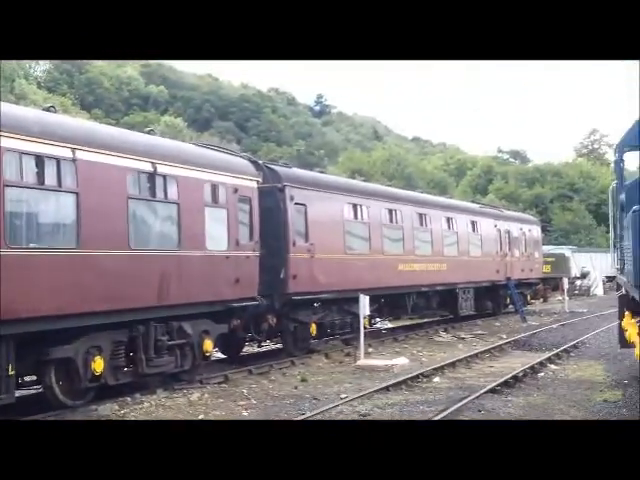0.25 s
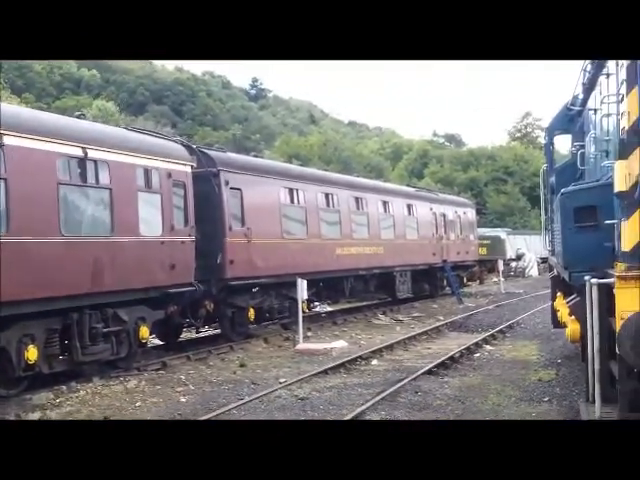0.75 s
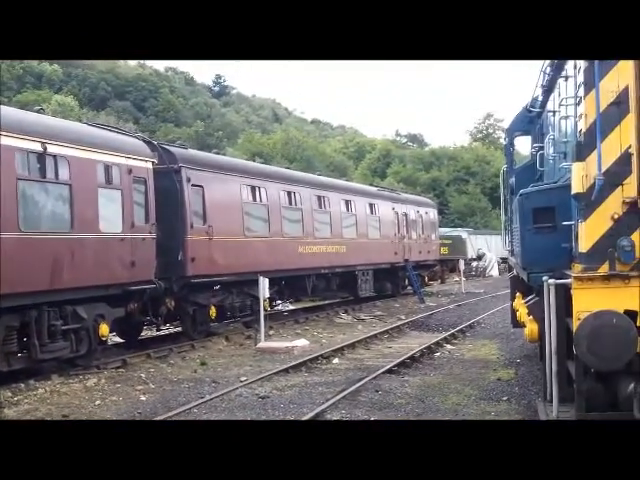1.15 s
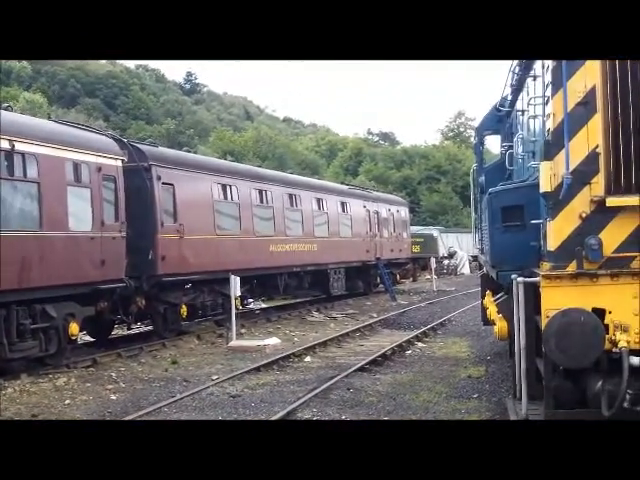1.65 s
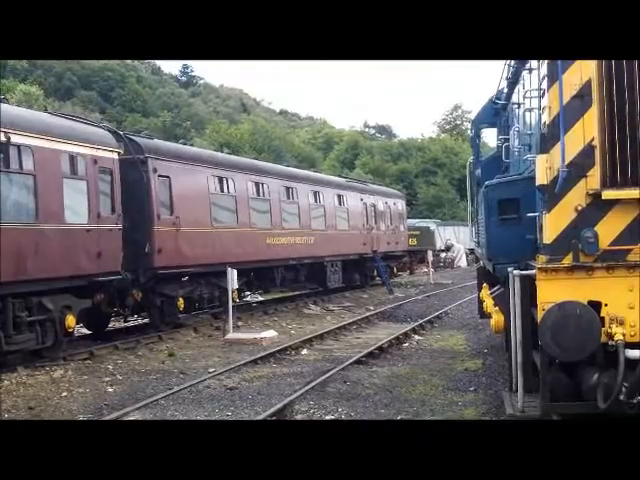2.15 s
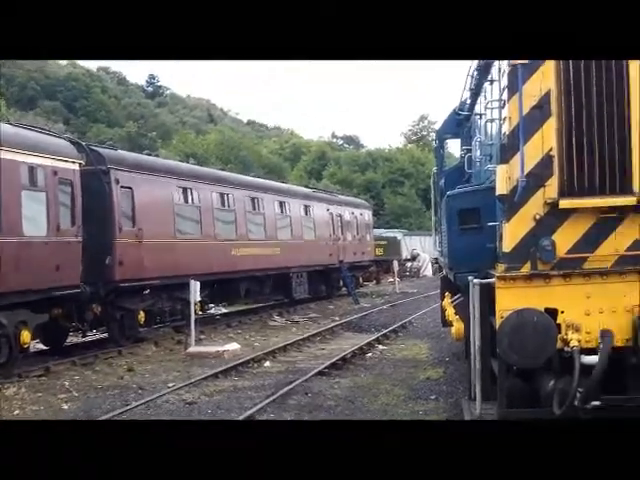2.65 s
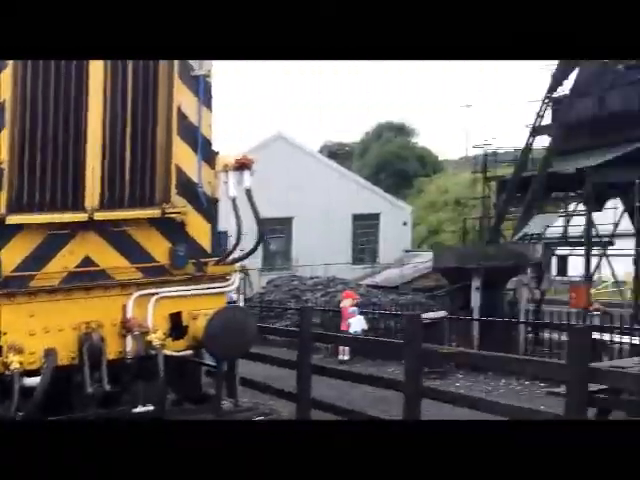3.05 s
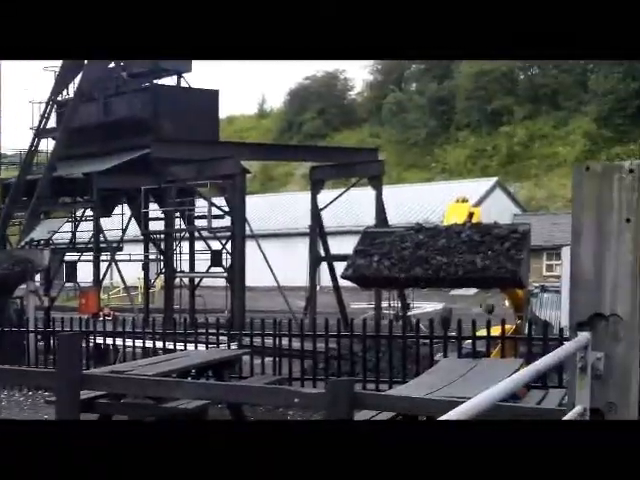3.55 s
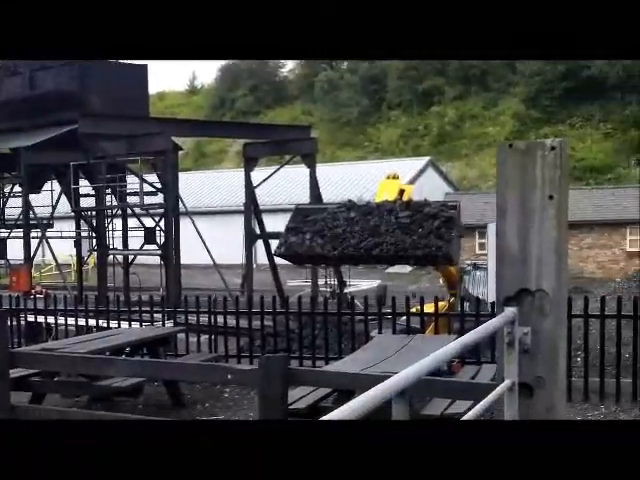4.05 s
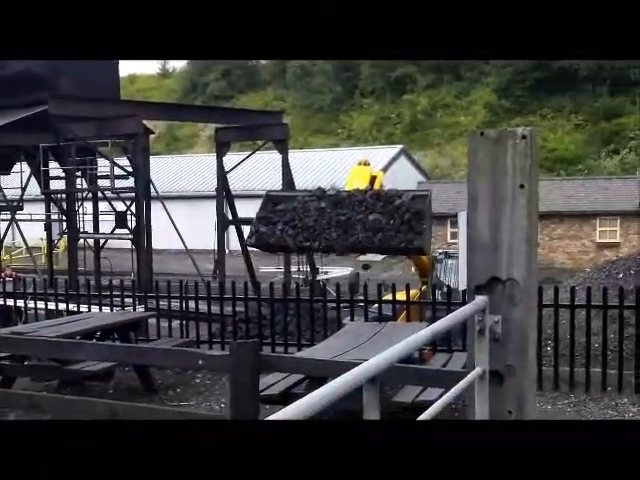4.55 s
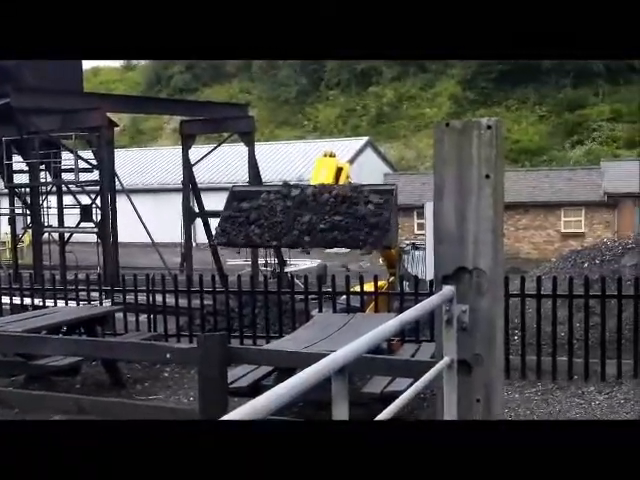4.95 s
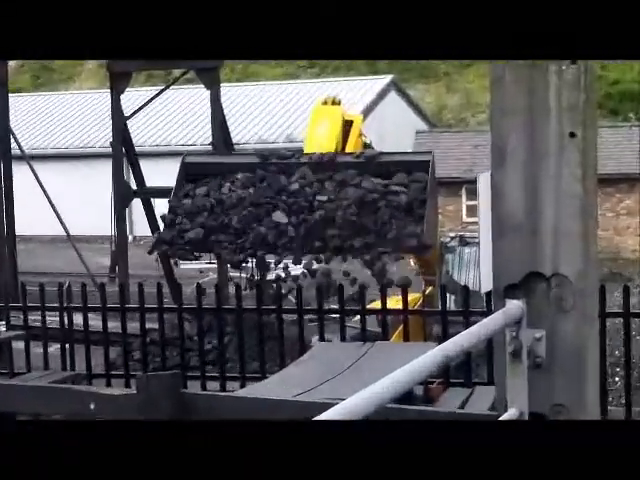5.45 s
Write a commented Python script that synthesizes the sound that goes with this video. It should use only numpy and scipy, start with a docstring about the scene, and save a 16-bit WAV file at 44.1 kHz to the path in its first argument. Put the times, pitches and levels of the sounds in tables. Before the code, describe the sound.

In an open railway yard a loader's diesel drones low, with airy noise and wind buffeting the microphone. Within a second, small coal builds into a dense dry clatter full of sharp cracks and hollow knocks. It thins into uneven bursts, then big lumps slump and thud with low booms before the pour swells again. Small, slightly dull microphone, short echo from sheds.

```python
"""Coal pours from a wheel loader's bucket across an open railway yard.
A rush of small coal is a hail of short ringing contacts, with snapping cracks and hollow knocks of single pieces.
Then heavy lumps come down: damped low thuds, and slumps that boom through gliding resonances over a rumble.
The loader's diesel, a stack of wavering sines, drones under it with filtered-noise air and light wind on the
microphone; nearby sheds answer the coal with a decaying diffuse tail."""
import sys
import numpy as np
from scipy import signal
from scipy.fft import rfft, irfft, next_fast_len
from scipy.io import wavfile
from scipy.ndimage import map_coordinates

SR = 44100
rng = np.random.default_rng(int(sys.argv[2]) if len(sys.argv) > 2 else 0)


def int16_out(signal):
    """Quantize to a 16-bit WAV file."""
    q = np.round(np.clip(np.atleast_2d(signal).T, -1, 1) * 32767)
    wavfile.write(sys.argv[1], SR, q.astype(np.int16))


N = 251370  # length [samples]

# orders of the loader's diesel: (frequency [Hz], level [dB])
DIESEL_ORDERS = [(33.3, -41.5), (66.6, -44.5), (133.2, -62), (166.5, -53.5), (211, -50)]
# tone of the yard's steady air: (frequency [Hz], relative level [dB])
YARD_TONE = [(20, 4.5), (70, -5), (200, -2), (300, -10), (800, -13.5), (2000, -16), (4500, -32.5),
             (7000, -40), (10000, -36), (15000, -40.5)]
# tone of the wind on the microphone: (frequency [Hz], relative level [dB])
WIND_TONE = [(8, -16.5), (20, -2.5), (35, -8.5), (60, -8.5), (120, -19), (400, -81), (1000, -100)]
# strength of the wind: (time [s], level [dB])
WIND_LEVEL = [(0, -56), (.2, -34), (1.4, -40), (1.7, -35.5), (2.35, -33), (2.7, -41), (4.5, -40),
              (5.1, -36), (5.7, -43)]

# the steady stream of small coal over the bucket's lip: (time [s], level [dB])
STREAM_LEVEL = [(0, -61), (.25, -47), (.42, -39.5), (.63, -35), (.9, -30.5), (1.12, -24), (1.5, -22),
                (1.84, -23.5), (1.88, -22.5), (2.24, -25), (2.38, -24.5), (2.46, -26.5), (2.56, -26),
                (3.05, -27), (3.3, -26.5), (3.4, -32), (3.8, -31), (4.0, -34), (4.15, -31.5), (4.3, -35.5),
                (4.68, -35), (4.85, -28.5), (5.04, -34.5), (5.14, -34), (5.42, -25.5), (5.7, -23.5)]
# batches of small coal sliding off on top of the stream: (time [s], length [s], level [dB])
SPILL_BATCHES = [(0.481, 0.042, -35.5), (0.591, 0.062, -32.5), (0.74, 0.036, -37), (2.489, 0.091, -25.5),
                 (2.657, 0.1, -28.5), (2.87, 0.057, -28), (2.981, .045, -25), (3.18, 0.028, -30.5),
                 (3.432, 0.011, -25.5), (3.59, 0.0099, -25), (3.63, 0.074, -30), (3.761, 0.085, -27),
                 (3.907, 0.012, -25), (4.128, 0.027, -26.5), (4.174, 0.044, -33.5), (4.392, 0.016, -27),
                 (4.548, 0.039, -30), (4.614, 0.032, -24.5), (4.74, 0.037, -28.5), (4.854, 0.02, -26),
                 (4.9, 0.021, -23.5), (4.978, 0.027, -27), (5.161, 0.076, -28), (5.252, 0.044, -28),
                 (5.463, 0.099, -23.5)]
SPILL_ATTACK_S, SPILL_RELEASE_S = 0.0064, 0.015
# tone of the clatter: (frequency [Hz], relative level [dB])
CLATTER_TONE = [(350, -26), (650, -11), (1100, -3), (1500, -1), (2500, 1.5), (3300, -2.5), (4000, -6.5),
                (4700, -14), (6200, -19.5), (7000, -24.5), (9000, -32.5), (15000, -110)]
# a bed of coal builds up between these times and softens the landing
BED_STARTS_S, BED_DEEP_S = 1, 4.4
# coarse clatter and fine crackle relative to the middle band, on bare ground and on the bed
COARSE_BARE_DB, COARSE_BEDDED_DB = -3, -6
FINE_BARE_DB, FINE_BEDDED_DB = -11, -13
# bigger pieces that clack singly, relative to the slack; they fade as the flow thins below FULL_FLOW_DB
COBBLES_DB, FULL_FLOW_DB = -7, -22
# highest hiss, relative to the flow of small coal
FIZZ_BARE_DB, FIZZ_BEDDED_DB = -34.5, -36.5

# single lumps cracking on each other: (time [s], level [dB], pitch [Hz], t60 of the chip spray [s])
LUMP_CRACKS = [(.188, -29, 1700, .07), (.214, -29, 1900, .07), (.308, -22.5, 1700, .04),
               (.3398, -16.5, 1650, .06), (.4, -26, 2800, .08), (.445, -22.5, 1800, .04),
               (.485, -17.5, 2200, .07), (.6, -20, 2000, .06), (.636, -16, 2400, .05),
               (.739, -18, 2400, .04), (.824, -16.5, 2300, .05), (.856, -16.5, 2100, .04),
               (.895, -17, 2000, .05), (.944, -13, 1300, .03), (.947, -14, 2200, .04),
               (.987, -12.5, 2000, .08), (1.013, -10, 1500, .05), (1.049, -12, 2000, .025),
               (1.084, -10, 2000, .04), (1.102, -9, 1900, .06), (1.154, -10, 1800, .07),
               (1.184, -11.5, 1300, .04), (1.209, -10.5, 1700, .05), (1.367, -8.5, 2400, .08),
               (1.417, -10.5, 2300, .07), (1.502, -11, 2400, .05), (1.668, -10, 1800, .05),
               (1.71, -9.5, 2300, .06), (1.792, -11, 1600, .03), (1.83, -10, 2100, .05),
               (1.926, -9.5, 2300, .06), (2.066, -10, 2200, .05), (2.107, -11.5, 2000, .04),
               (2.332, -12, 2000, .06), (2.506, -12, 2300, .04), (2.54, -10, 1700, .08),
               (2.666, -13, 2100, .07), (2.722, -12.5, 2100, .04), (2.741, -12.5, 2100, .05),
               (2.845, -11.5, 2500, .04), (2.915, -13.5, 2400, .06), (2.983, -11, 2100, .07),
               (3.069, -11, 1400, .05), (3.101, -9, 2700, .055), (3.155, -11, 2000, .05),
               (3.202, -15.5, 2600, .05), (3.261, -15, 6400, .035), (3.287, -10, 2400, .08),
               (3.334, -14.5, 2400, .06), (3.419, -16, 1600, .04), (3.44, -17.5, 2400, .05),
               (3.489, -15, 3200, .06), (3.508, -16, 2200, .03), (3.524, -17.5, 2300, .04),
               (3.545, -18.5, 2200, .06), (3.586, -12, 2100, .08), (3.633, -13.5, 2200, .07),
               (3.642, -16, 4500, .11), (3.673, -15.5, 2500, .05), (3.72, -11, 2200, .06),
               (3.735, -10, 2400, .04), (3.801, -7.5, 2700, .025), (3.915, -16.5, 2300, .06),
               (3.947, -17.5, 2500, .07), (4.025, -14.5, 3000, .08), (4.071, -16.5, 1900, .06),
               (4.105, -17, 2500, .06), (4.157, -16, 2450, .05), (4.211, -15, 2100, .05),
               (4.233, -19, 2400, .05), (4.305, -19.5, 2200, .06), (4.356, -21.5, 1800, .06),
               (4.4, -17.5, 2200, .06), (4.494, -23, 2200, .05), (4.535, -13.5, 1900, .05),
               (4.552, -16, 1700, .05), (4.602, -12.5, 2100, .05), (4.646, -11, 2100, .04),
               (4.698, -16, 2500, .08), (4.736, -11.5, 2900, .05), (4.75, -8, 2200, .045),
               (4.828, -9, 2500, .045), (4.86, -13, 2900, .05), (4.918, -11.5, 2200, .045),
               (4.95, -10.5, 2650, .07), (4.982, -13, 2700, .05), (5.013, -16.5, 2500, .05),
               (5.057, -15, 2350, .06), (5.095, -16, 2900, .08), (5.196, -13, 2500, .05),
               (5.277, -10.5, 1900, .045), (5.3115, -12, 1600, .035), (5.361, -11, 2600, .055),
               (5.39, -13.5, 2200, .05), (5.487, -10, 2800, .07), (5.598, -10, 2700, .05),
               (5.67, -12, 2200, .05)]
# parts of a crack relative to its level, and how fast the fracture dies
SNAP_DB, BURST_DB, CHIPS_DB, BURST_T60_S = -3.5, -6.5, -9, .016
CHIPS_PER_S = 1400

# hollow patter of lighter pieces: (time [s], level [dB])
PATTER_LEVEL = [(0, -59), (.45, -46.5), (.65, -37), (1.1, -33), (1.7, -37), (2.4, -38.5), (3, -46),
                (4.5, -43), (4.8, -37.5), (5.08, -33.5), (5.2, -32), (5.6, -29.5)]
# tone of the patter: (frequency [Hz], relative level [dB])
PATTER_TONE = [(200, -27.5), (320, -13), (420, 0), (540, 0), (700, -2.5), (1100, -27), (2000, -37)]
# solid pieces, fist-sized or smaller: (time [s], level before trim [dB], pitch [Hz], hardness [0-1])
SOLID_KNOCKS = [(.3398, -17, 1300, .4), (.445, -27, 1100, .3), (.751, -20, 500, .2), (.887, -14.5, 530, .3),
                (.9425, -11, 420, .7), (.9465, -10, 800, .7), (.995, -19, 438, .2), (1.012, -16, 1260, .3),
                (1.101, -15, 517, .5), (1.208, -11.5, 900, .3), (1.485, -16.5, 440, .3),
                (1.669, -9, 1670, .2), (1.775, -13.5, 460, .4), (1.792, -9, 1750, .2),
                (2.073, -17.5, 505, .3), (2.084, -15, 450, .3), (2.175, -18, 430, .1),
                (2.248, -16.5, 490, .3), (2.285, -20, 500, .3), (2.312, -18, 450, .1), (2.33, -19, 560, .2),
                (2.417, -18, 520, .3), (2.429, -15.5, 480, .2), (2.467, -19, 525, .2),
                (2.761, -18.5, 460, .3), (3.069, -17, 1150, .5), (3.201, -19, 440, .2),
                (3.22, -22, 470, .2), (3.324, -18.5, 430, .3), (3.419, -19.5, 470, .5),
                (3.546, -19.5, 520, .4), (3.649, -18, 542, .1), (3.712, -22, 430, .1),
                (4.071, -21, 520, .4), (4.145, -16, 461, 0), (4.5512, -13, 1300, .5),
                (5.312, -6.5, 1700, 0)]

# the heaviest lumps landing: (time [s], level before trim [dB], pitch [Hz], hardness [0-1])
HEAVY_THUDS = [(2.609, -13.5, 168, 1), (3.508, -16.5, 108, 0.24), (3.882, -16, 144, .1),
               (4.154, -23, 298, 0.2), (4.381, -10, 148, 0.22), (4.851, -17, 179, 0.1),
               (5.029, -7, 295, 0.04), (5.062, -11, 250, 0.6), (5.092, -14, 230, .3),
               (5.108, -8, 318, 0.12), (5.123, -11, 94, .6), (5.375, -10, 224, 0.3), (5.413, -12, 210, 0.3)]
# masses of big lumps breaking loose: (time [s], length [s], build-up [s], level [dB],
# boom pitch at the start [Hz], at the end [Hz], broad rumble relative to the boom [dB])
BIG_SLUMPS = [(3.5, 0.032, .01, -30, 105, 120, -6), (3.825, 0.067, 0.013, -23.5, 172, 146, -6),
              (3.987, 0.065, 0.0086, -33, 215, 180, -5.5), (4.053, 0.1, 0.027, -24, 160, 122, -18),
              (4.14, 0.058, .02, -25, 212, 189, -8), (4.192, 0.1, 0.012, -28, 102, 165, -14),
              (4.298, 0.14, 0.043, -24, 135, 150, -10), (4.425, 0.18, .02, -33, 242, 199, -10),
              (4.705, .19, 0.14, -25, 155, 190, 1), (4.899, 0.13, 0.013, -21, 202, 133, -6.5),
              (5.005, 0.15, .02, -23, 312, 238, -0.5), (5.268, 0.15, 0.068, -21, 272, 221, -13),
              (5.538, 0.14, 0.015, -28, 205, 227, -4)]
# tone of the heap's rumble: (frequency [Hz], relative level [dB])
RUMBLE_TONE = [(35, -31), (70, -6), (110, -0.5), (140, 0.5), (190, -2.5), (270, -0.5), (430, -8),
               (600, -20.5), (900, -32), (1600, -61)]
SLUMP_RELEASE_S = 0.011  # the landing stops quickly
ROLL_DB, ROLL_PER_LENGTH = -11.5, 1  # lumps roll on: relative level, decay time over the slump's length
BOOM_WIDTH_HZ = 35  # spread of the boom to each side of its pitch

# decay of the sheds' answer: (frequency [Hz], t60 [s])
SHED_DECAY = [(100, 0.74), (1500, 0.2), (7000, 0.15)]
# microphone colour: (frequency [Hz], gain [dB])
MIC_COLOUR = [(6700, -1), (7150, -5.5), (7500, -48), (8000, -29), (8400, -7), (9500, -3.5), (15000, -3.5)]
TOP_HZ = 14890  # the microphone passes nothing above this


def amp(db):
    """Decibels to gain."""
    return 10 ** (np.asarray(db) / 20)


def unit(x):
    """Scale to rms 1."""
    return x / np.sqrt(np.mean(x ** 2) + 1e-20)


def along(points, hz):
    """(Hz, value) points read on a log frequency axis."""
    f, v = np.transpose(points)
    return np.interp(np.log(hz + 1), np.log(f + 1), v)


def curves(rows):
    """One value per sample for each column after the time."""
    s, *cols = np.transpose(rows)
    return [np.interp(np.arange(N) / SR, s, c) for c in cols]


def wobble(rate):
    """A smooth random curve, rate knots a second."""
    knots = rng.standard_normal(int(N * rate / SR) + 4)
    return map_coordinates(knots, [np.arange(N) * rate / SR])


def filtered(x, response):
    """x times a response of frequency."""
    m = next_fast_len(len(x) + SR // 4)
    return irfft(rfft(x, m) * response(np.fft.rfftfreq(m, 1 / SR)), m)[:len(x)]


def coloured(x, spectrum, size=4096):
    """x through a causal filter with the given (Hz, dB) shape, so attacks stay sharp."""
    gain = amp(along(spectrum, np.fft.rfftfreq(size, 1 / SR)))
    # folding the cepstrum forward makes the filter minimum phase
    cepstrum = irfft(np.log(gain + 1e-6))
    cepstrum[1:size // 2] *= 2
    cepstrum[size // 2 + 1:] = 0
    return signal.fftconvolve(x, irfft(np.exp(rfft(cepstrum))))[:len(x)]


def split(x, edge_hz, order=8):
    """The parts of x below and above an edge."""
    low = filtered(x, lambda hz: 1 / (1 + (hz / edge_hz) ** order))
    return low, x - low


def evened(x, span_s):
    """x held near rms 1 over the given span: a steady supply of lumps."""
    window = signal.windows.hann(int(span_s * SR))
    power = signal.fftconvolve(x ** 2, window / window.sum(), "same")
    return x / np.sqrt(np.abs(power) + 1e-9)


def add(track, s, sound):
    """Mix a sound in at time s."""
    part = track[round(s * SR):][:len(sound)]
    part += sound[:len(part)]


def background():
    """The loader's diesel drones in the yard's steady noise; wind nudges the microphone."""
    t = np.arange(N) / SR
    drift = np.cumsum(0.0098 * wobble(3.11)) / SR  # all engine orders waver together
    diesel = np.zeros(N)
    for hz, db in DIESEL_ORDERS:
        level = amp(db + 1.8 * wobble(5.13))
        diesel += level * np.sin(2 * np.pi * (hz * (t + drift) + rng.random()))
    air = unit(coloured(rng.standard_normal(N), YARD_TONE))
    wind_db, = curves(WIND_LEVEL)
    wind = unit(coloured(rng.standard_normal(N), WIND_TONE) * amp(2.8 * wobble(11)))
    return amp(-1.5) * diesel + amp(-38.5) * air + amp(wind_db) * wind


def impacts(rate, low_hz, high_hz, cycles, spread_db, size):
    """A random hail of contacts, each ringing for a few cycles at its own pitch; rms 1."""
    when, pitch, weight, phase = rng.random((int(rate * N / SR), 4)).T[:, :, None]
    hz = low_hz + (high_hz - low_hz) * pitch
    # many small pieces, few big ones
    strength = amp(-spread_db * np.log(weight + .022)) * np.sqrt(hz)
    turns = hz * np.arange(size) / SR
    rings = strength * np.sign(phase - .5) * np.exp(-turns / cycles) * np.sin(2 * np.pi * turns)
    places = (when * N).astype(int) + np.arange(size)
    return unit(np.bincount(places.ravel(), rings.ravel(), N)[:N])


def clumps(rate, life, depth):
    """Gain of a flow that arrives in sudden spills, each dying away; rms 1."""
    starts = np.zeros(N)
    when, weight = rng.random((int(rate * N / SR), 2)).T
    starts[(when * N).astype(int)] = weight
    spills = signal.lfilter([1], [1, -np.exp(-1 / (life * SR))], starts)
    return unit(np.sqrt(1 + abs(depth) * spills))


def swell(s, length, attack_s, release_s):
    """Gain of one slide: it rises, holds until its length is up and dies away."""
    t = np.arange(N) / SR - s
    return np.clip(t / attack_s, 0, 1) * np.exp(-np.maximum(t - length, 0) / release_s)


def flow_db():
    """Level of the small coal in the air: the stream and its spills add in power."""
    stream_db, = curves(STREAM_LEVEL)
    power = amp(stream_db) ** 2
    for s, length, db in SPILL_BATCHES:
        power = power + (amp(db) * swell(s, length, SPILL_ATTACK_S, SPILL_RELEASE_S)) ** 2
    return 10 * np.log10(power)


def cushioned(bare_db, bedded_db):
    """A level that sinks as the first coal builds a bed for the rest."""
    return np.interp(np.arange(N) / SR, [BED_STARTS_S, BED_DEEP_S], [bare_db, bedded_db])


def pour():
    """Small coal clatters down as a hail of contacts; a thin flow is more broken up by spills than a full one."""
    level_db = flow_db()
    coarse_db = cushioned(COARSE_BARE_DB, COARSE_BEDDED_DB)
    fine_db = cushioned(FINE_BARE_DB, FINE_BEDDED_DB)
    slack = impacts(rate=7000, low_hz=522, high_hz=7570, cycles=1.58, spread_db=1.0, size=160)
    nuts = impacts(rate=650, low_hz=530, high_hz=5920, cycles=1.9, spread_db=2.0, size=400)
    # hard shards ring a little longer
    clinks = impacts(rate=330, low_hz=899.0, high_hz=6970, cycles=36.0, spread_db=2, size=1600)
    fullness = np.clip((level_db + 44) / 40, .35, .55)
    spills = fullness + (1 - fullness) * clumps(rate=96, life=0.0076, depth=4.6)
    small = (slack + amp(-6.5) * nuts + amp(-5.5) * clinks) * spills
    cobbles = impacts(rate=170, low_hz=900, high_hz=4200, cycles=1.8, spread_db=1.2, size=500)
    big = amp(COBBLES_DB) * np.minimum(amp(level_db - FULL_FLOW_DB), 1) * cobbles
    stream = evened(coloured(big + small, CLATTER_TONE), span_s=0.27)
    # balance three bands, so the bed can soften the coarse and fine ones
    coarse, rest = split(stream, edge_hz=1650)
    middle, fine = split(rest, edge_hz=4190)
    bands = unit(middle) + amp(coarse_db) * unit(coarse) + amp(fine_db) * unit(fine)
    return amp(level_db - 1.0) * bands


def fizz():
    """A faint, flickering high hiss of filtered noise that swells with the pour."""
    level_db = flow_db() + cushioned(FIZZ_BARE_DB, FIZZ_BEDDED_DB)
    tone = [(7000, -40), (8800, -6), (10000, 9.0), (11500, -0.5), (15000, -19)]  # (Hz, dB)
    hiss = coloured(rng.standard_normal(N), tone)
    return amp(level_db) * unit(hiss * clumps(rate=33, life=0.016, depth=2.4))


def around(x, hz, focus):
    """x gathered around a pitch, more tightly for a higher focus; rms 1."""
    return unit(filtered(x, lambda f: 1 / (1 + focus * np.log((f + 1) / hz) ** 2) ** 2))


def cracks(focus=2.6, burst_focus=2.8):
    """A lump strikes with a brittle snap, fractures in a brief wide burst and sprays chips around its pitch."""
    out, t = np.zeros(N), np.arange(SR // 8) / SR
    for s, db, hz, spray_t60 in LUMP_CRACKS:
        snap = amp(SNAP_DB) * np.exp(-hz * t / 1.2) * np.sin(2 * np.pi * hz * t)
        burst = around(rng.standard_normal(len(t)), hz, burst_focus) * amp(BURST_DB - 60 * t / BURST_T60_S)
        # sparse clicks of random sign
        spray = rng.choice([-1, 1], len(t)) * (rng.random(len(t)) < CHIPS_PER_S / SR)
        chips = around(spray, hz, focus) * amp(CHIPS_DB - 60 * t / spray_t60)
        add(out, s, amp(db) * (snap + burst + chips))
    return coloured(out, [(3000, 0), (4500, -2.5), (7000, -6), (8500, -33), (15000, -55)])  # duller top


def blow(hz, cycles, rough, hardness):
    """One blow of peak 1: a damped swing at the lump's pitch, and a crunch that is brighter if hard."""
    t = np.arange(SR // 8) / SR
    hardness = np.clip(hardness, 0, 1)
    noise = rng.standard_normal(len(t))
    crunch = unit(filtered(noise, lambda f: f / hz / (1 + (f / hz) ** (4 - 7.2 * hardness))))
    decay = np.exp(-hz * t * (1 + 2 * hardness) / cycles)  # hard contacts are over sooner
    onset = 1 - np.exp(-6 * hz * t)
    swing = (np.sin(2 * np.pi * hz * t) + rough * crunch) * decay * onset
    # a big lump meets the heap slowly
    lowpass = signal.butter(2, min(5 * hz, SR / 4), fs=SR, output="sos")
    swing = signal.sosfilt(lowpass, swing)
    return swing / np.abs(swing).max()


def knocks():
    """Solid pieces knock hollowly on the heap and bounce once, over a patter of lighter ones."""
    level_db, = curves(PATTER_LEVEL)
    patter = impacts(rate=300, low_hz=284, high_hz=955, cycles=2.0, spread_db=2.5, size=1500)
    out = amp(level_db) * unit(coloured(patter, PATTER_TONE))
    for s, db, hz, hardness in SOLID_KNOCKS:
        knock = blow(hz, cycles=4.6, rough=0.25, hardness=hardness)
        add(out, s, amp(db - 2.5) * knock)
        bounce_s = s + rng.uniform(0.00557, 0.01805)
        bounce = blow(hz, cycles=1.9, rough=0.38, hardness=hardness)
        add(out, bounce_s, amp(db - 12) * bounce)
    return out


def resonance(x, pitch_hz, width_hz):
    """x through a steep resonance that follows a pitch curve: shifted to 0 Hz, low-passed, shifted back."""
    turn = np.exp(2j * np.pi * np.cumsum(pitch_hz) / SR)
    lowpass = signal.butter(2, width_hz, fs=SR, output="sos")
    return unit((signal.sosfilt(lowpass, x / turn) * turn).real)


def tumble():
    """Big lumps break loose in slumps that boom on a gliding pitch and roll on; the heaviest land in thuds."""
    out = np.zeros(N)
    pounding = impacts(rate=900, low_hz=60, high_hz=607, cycles=0.98, spread_db=0.5, size=2400)
    rumble = impacts(rate=510, low_hz=59.5, high_hz=980, cycles=1.55, spread_db=0, size=2400)
    rumble = evened(coloured(rumble, RUMBLE_TONE), span_s=0.037)
    for s, length, build_s, db, start_hz, end_hz, rumble_db in BIG_SLUMPS:
        part = np.arange(N)[round(s * SR):][:SR]
        landing = swell(s, length, build_s, SLUMP_RELEASE_S)[part]
        rolling = amp(ROLL_DB) * swell(s, length, build_s, ROLL_PER_LENGTH * length)[part]
        pitch_hz = np.interp(part / SR, [s, s + length], [start_hz, end_hz])
        boom = evened(resonance(pounding[part], pitch_hz, BOOM_WIDTH_HZ), span_s=0.034)
        rumble_gain = np.hypot(amp(rumble_db) * landing, rolling)
        add(out, s, amp(db) * (landing * boom + rumble_gain * rumble[part]))
    for s, db, hz, hardness in HEAVY_THUDS:
        add(out, s, amp(db - 3) * blow(hz, cycles=1.8, rough=0.3, hardness=hardness))
    return out


def sheds(x):
    """The diffuse answer of sheds and wagons: x through a decaying noise tail, treble dying first."""
    hz, t, z = signal.stft(rng.standard_normal(SR // 2), SR, nperseg=256)
    decay = amp(-60 * t / along(SHED_DECAY, hz)[:, None])
    tail = signal.istft(z * decay, SR, nperseg=256)[1]
    return signal.fftconvolve(x, tail / np.linalg.norm(tail))[:N]


def scene():
    """Falling coal, its echo and the yard."""
    coal = pour() + cracks() + knocks() + tumble()
    return (coal + amp(-16.0) * sheds(coal) + fizz() + background())[None]


def record(dry):
    """A small microphone with a deep dip near 7.5 kHz, a dull top and a band limit."""
    return filtered(dry[0], lambda hz: amp(along(MIC_COLOUR, hz)) * (hz < TOP_HZ))[None]


dry = scene()
out = record(dry)
int16_out(out)
```